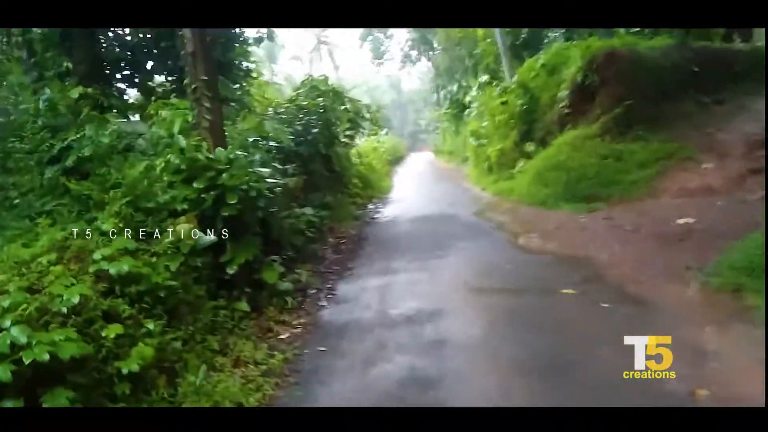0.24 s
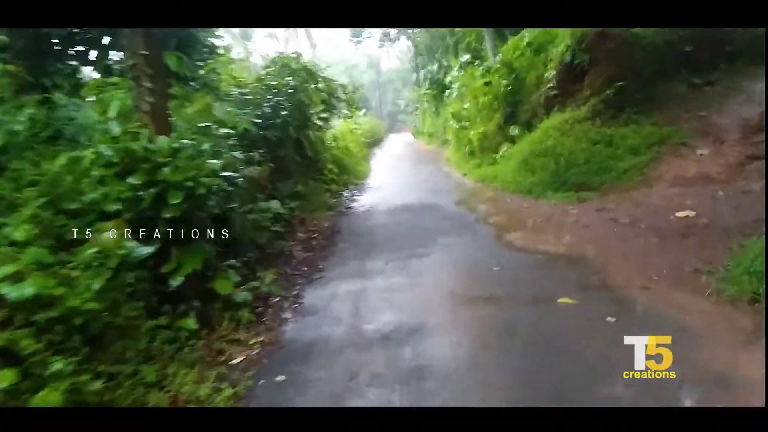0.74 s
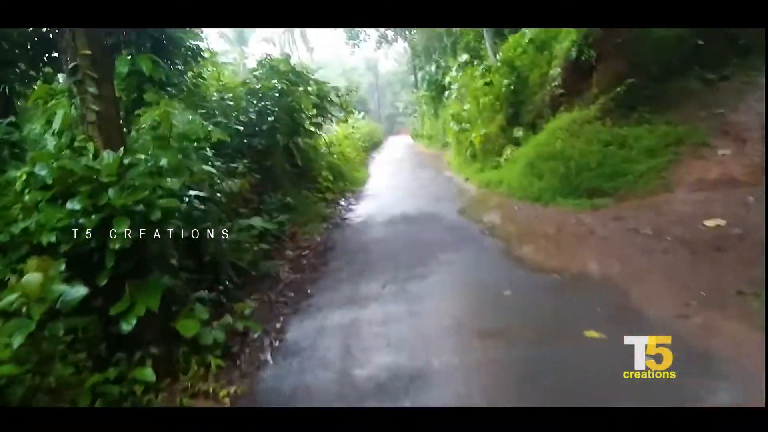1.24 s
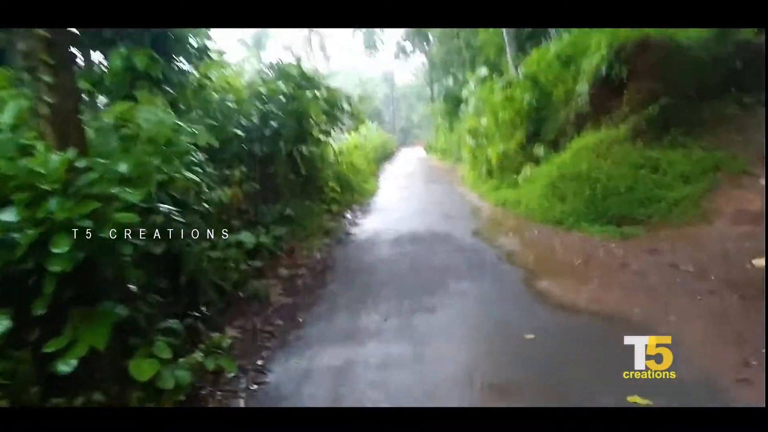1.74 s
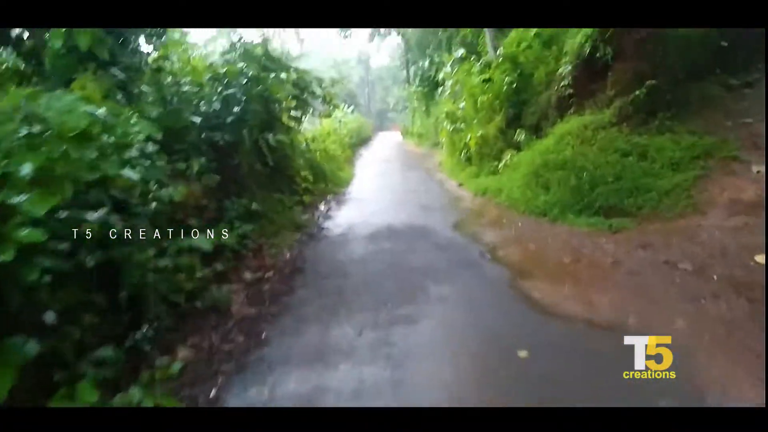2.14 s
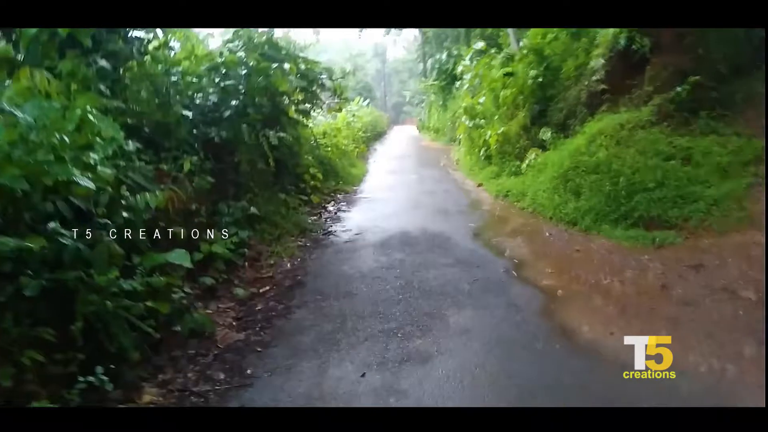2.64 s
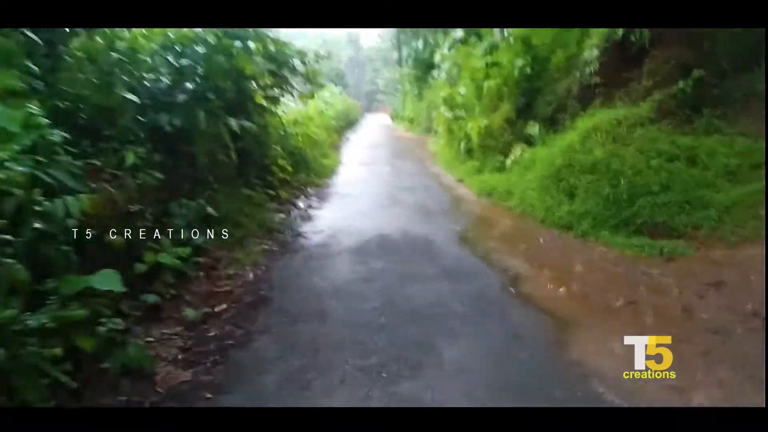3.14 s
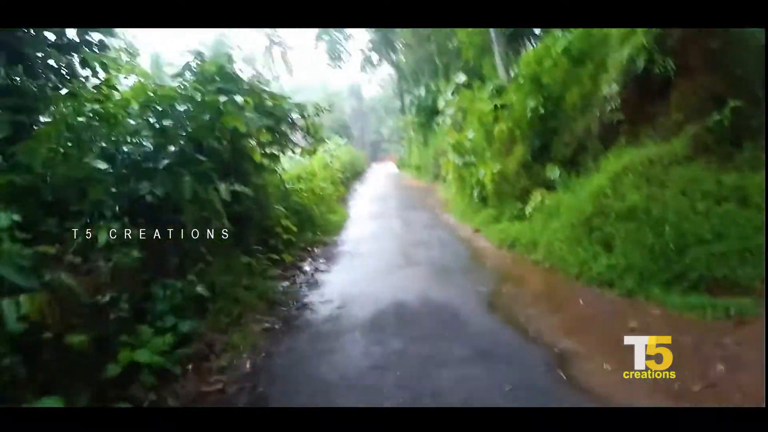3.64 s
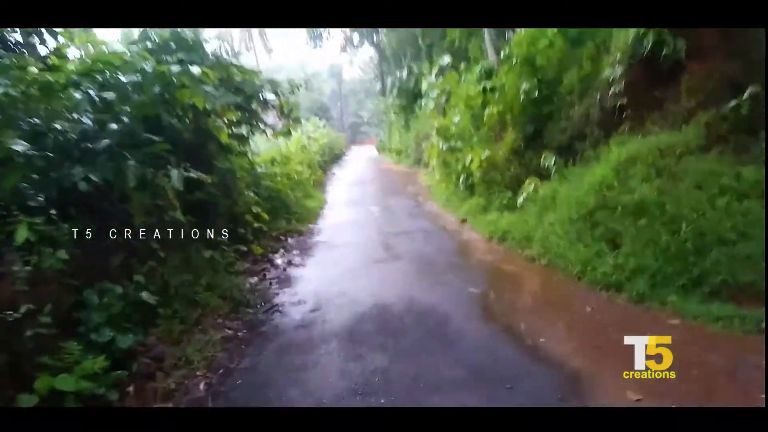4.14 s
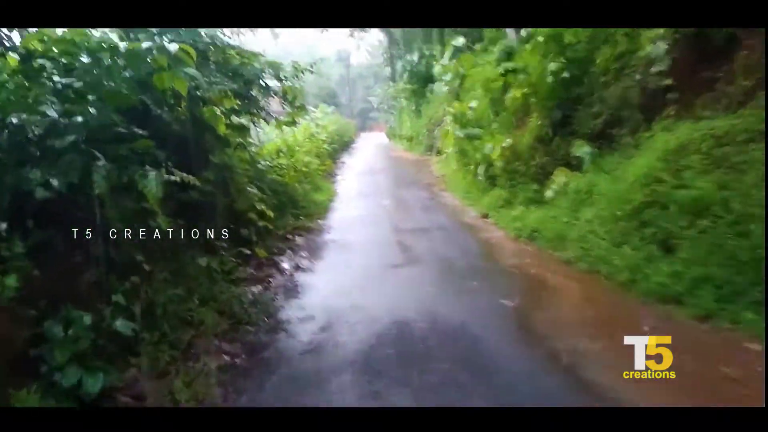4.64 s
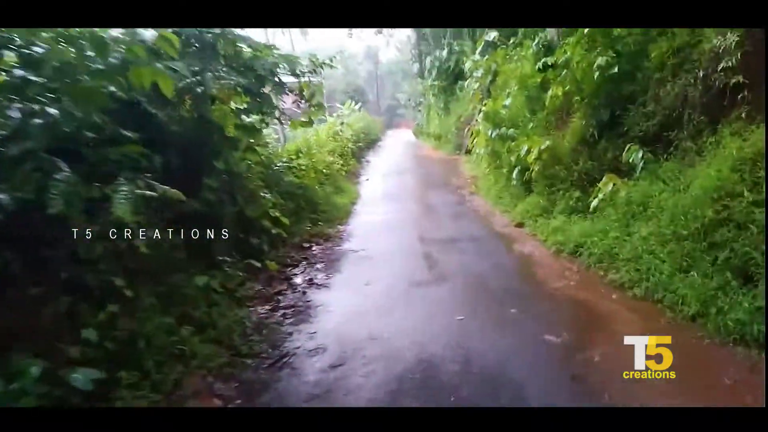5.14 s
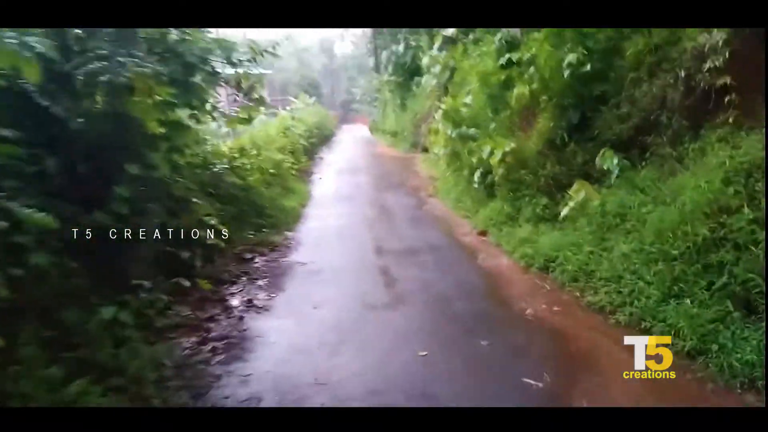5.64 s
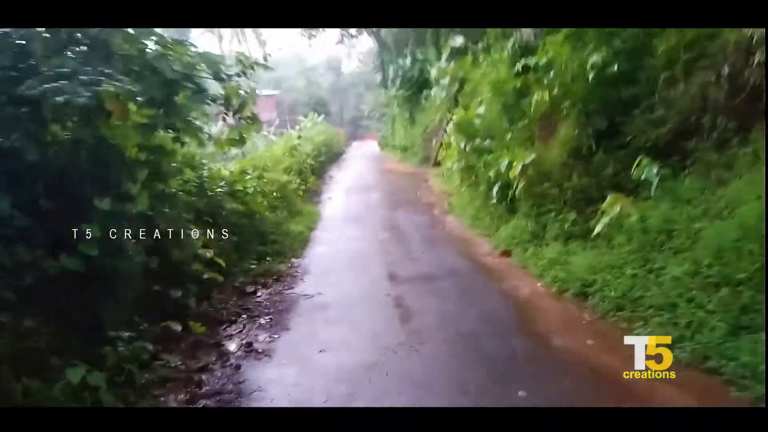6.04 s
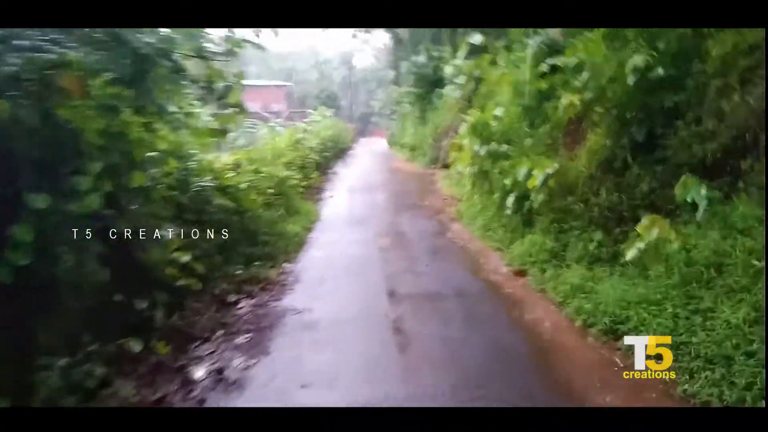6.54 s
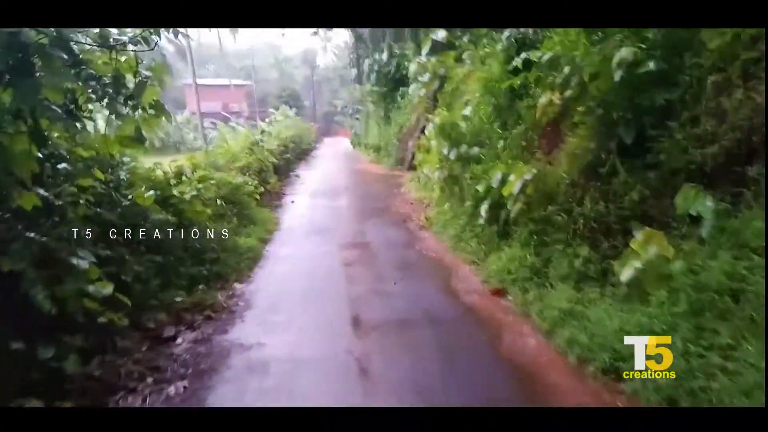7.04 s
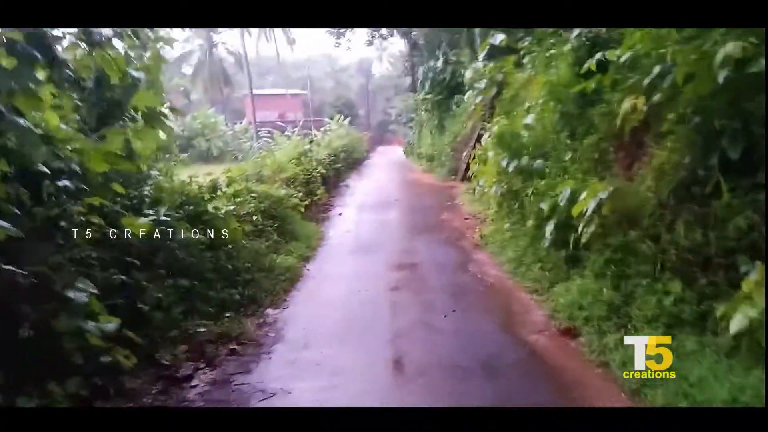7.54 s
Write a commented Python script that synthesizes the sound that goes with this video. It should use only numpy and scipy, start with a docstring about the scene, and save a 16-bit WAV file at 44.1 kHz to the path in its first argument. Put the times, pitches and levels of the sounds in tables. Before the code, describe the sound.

Close under an umbrella on a wet lane between bushes, steady rain makes a continuous hiss and dense patter on leaves. Fine drops drum on the cloth, with crisp little ticks nearby. After the first moment, heavy drips strike overhead at irregular intervals, some dull thumps, some tight pops, some splashy snaps, in loose clusters to the end.

```python
"""A country lane in steady monsoon rain, heard from under an umbrella carried between wet bushes.
Far rain is a smooth hiss of filtered noise; rain on leaves and cloth is random clicks smeared into noise puffs.
Near leaf drops are short pitched ticks; the carried umbrella rumbles softly in low band-passed noise.
Tree drips thump and ring the taut cloth as damped modes and burst into spray, with droplets trailing."""
import sys
import numpy as np
from scipy import signal
from scipy.fft import rfft, irfft
from scipy.io import wavfile
from scipy.ndimage import uniform_filter1d

SR = 44100
rng = np.random.default_rng(int(sys.argv[2]) if len(sys.argv) > 2 else 0)


def wav_record(signal):
    """Record a signal, one row per channel, as 16-bit PCM in the file named by sys.argv[1]."""
    frames = np.transpose(np.atleast_2d(signal))
    bounded = np.clip(frames, -1, 1)
    # unit amplitude maps onto the largest positive 16-bit level
    quanta = np.round(bounded * 32767).astype(np.int16)
    wavfile.write(sys.argv[1], SR, quanta)


N = 343980
TIME_S = np.arange(N) / SR
DROP_TIME_S = np.arange(1024) / SR
SPRAY_DECAY_S = .0011  # amplitude time constant


def undb(db):
    """Decibels to gain."""
    return 10 ** (np.asarray(db) / 20)


def unit(x):
    """Scale to rms 1."""
    return x / np.sqrt(np.mean(x ** 2))


def unit_blow(x):
    """Scale each row so that its energy equals rms 1 held for 2 ms."""
    energy = np.sum(x ** 2, axis=-1, keepdims=True)
    return x / np.sqrt(energy / (.002 * SR))


def butter(x, hz, kind):
    """Butterworth low-pass, high-pass or band-pass, design order 2."""
    return signal.sosfilt(signal.butter(2, hz, kind, fs=SR, output="sos"), x)


def colour(x, points):
    """Minimum-phase filter with the given (frequency [Hz], level [dB]) response: clicks keep a sharp front."""
    hz, db = np.transpose(points)
    bins_hz = np.arange(2049) * SR / 4096
    gain = undb(np.interp(np.log(bins_hz + 1), np.log(hz), db))
    cepstrum = irfft(np.log(gain))
    # fold the cepstrum onto positive time
    fold = 1 + np.sign(len(cepstrum) / 2 - np.arange(len(cepstrum)))
    fold[0] = 1
    impulse_response = irfft(np.exp(rfft(cepstrum * fold)))
    return signal.fftconvolve(x, impulse_response)[:N]


def walk(rate_hz):
    """Random levels held 1 / rate_hz s and slewed twice; spread near 1."""
    hold = int(SR / rate_hz)
    steps = np.repeat(rng.standard_normal(N // hold + 1), hold)
    slewed = uniform_filter1d(uniform_filter1d(steps, hold), hold)
    return 1.3 * slewed[:N]  # restores the spread lost in slewing


def mode(hz, t60_s):
    """A struck mode: starts at full swing and decays 60 dB in t60_s."""
    decay = np.exp(-np.log(1000) * DROP_TIME_S / t60_s)
    return np.cos(2 * np.pi * hz * DROP_TIME_S) * decay


def place(times_s, sounds):
    """Lay each short sound at its time."""
    index = (np.asarray(times_s) * SR).astype(int)[:, None] + np.arange(sounds.shape[1])
    return np.bincount(index.ravel(), sounds.ravel(), N)[:N]


def impacts(rate_hz, spread_db, top_db):
    """Clicks at random moments: many faint, few strong, sizes saturating at top_db."""
    size_db = top_db * np.tanh(spread_db * rng.exponential(size=N) / top_db)
    return (rng.random(N) < rate_hz / SR) * undb(size_db)


def spatter(clicks, decay_s):
    """Each click bursts into its own decaying puff of noise, so no two drops have the same colour."""
    keep = np.exp(-2 / (decay_s * SR))  # power decays twice as fast as amplitude
    power = signal.lfilter([1], [1, -keep], clicks ** 2)
    return unit(np.sqrt(power + 1e-18) * rng.standard_normal(N))


# fine-rain strength as the trees close and open overhead; only its departure from the mean counts:
# (time [s], level [dB])
SHOWER = [(0.0, -28), (0.39, -28.5), (2.37, -33.5), (2.58, -30.5), (3.08, -31), (3.78, -28.5), (4.47, -35),
          (5.02, -34), (5.49, -27.5), (6.04, -31), (6.89, -28), (6.97, -29.5), (7.39, -26), (7.8, -25.5)]


def shower_db():
    """Strength of the fine rain in dB above its average."""
    db = np.interp(TIME_S, *np.transpose(SHOWER))
    return db - db.mean()


# colour of rain on leaves and road, also of trailing droplets: (frequency [Hz], relative level [dB])
FOLIAGE = [(40, -13), (120, -2.5), (450, 1), (2500, 2), (5000, -1), (7000, 1.5), (8600, -4.5), (9800, -7),
           (10700, -11.5), (16000, -17)]


def surroundings(rate_hz=2600, spread_db=3.0, top_db=22, decay_s=0.00056, hiss_db=-2,
                 flicker_db=1, swell_db=0.18, follow=0.055, level_db=-25.5):
    """Dense patter on the bushes, coming in flurries, over the smooth hiss of far rain."""
    flurries = undb(flicker_db * walk(20))
    patter = flurries * spatter(impacts(rate_hz, spread_db, top_db), decay_s)
    hiss = undb(hiss_db) * rng.standard_normal(N)
    gain = undb(level_db + follow * shower_db() + swell_db * walk(3.4))
    return gain * unit(colour(patter + hiss, FOLIAGE))


# colour of fine rain on the cloth: (frequency [Hz], relative level [dB])
CLOTH = [(40, -31), (130, -6), (400, -1.5), (1050, -1), (2200, -2.5), (3500, -12.5), (7000, -12),
         (11000, -46)]


def fine_drops(mean_rate_hz=340, rate_slope=1.9, spread_db=4.5, top_db=18, level_db=-29.0):
    """Small raindrops drum on the cloth: lone taps under the trees, a dense roll where they open."""
    flow = unit(undb(rate_slope * shower_db())) ** 2  # mean 1
    taps = spatter(impacts(mean_rate_hz * flow, spread_db, top_db), SPRAY_DECAY_S)
    return undb(level_db) * unit(colour(taps, CLOTH))


def leaf_ticks(count=600, low_hz=1300, high_hz=8000, t60_s=0.0059, spread_db=3.0, top_db=15,
               follow=1.0, level_db=-31):
    """Single drops on near leaves and the umbrella's rim: each a brief tick of its own pitch."""
    when, pitch, size, partner = rng.random((count, 4)).T[:, :, None]
    hz = low_hz + (high_hz - low_hz) * pitch
    # a lower, faster-dying partner is subtracted, so the tick starts from zero
    tick = unit_blow(mode(hz, t60_s) - mode(hz / (1 + partner / 2), t60_s / 2))
    size_db = top_db * np.tanh(-spread_db * np.log(1 - size) / top_db)
    shower_level_db = follow * shower_db()[(when * N).astype(int)]
    ticks = undb(size_db + shower_level_db + level_db) * tick
    return butter(place(when[:, 0] * N / SR, ticks), high_hz, "low")


def specks(rate_hz=40, spread_db=5, top_db=20, low_hz=7000, level_db=-45):
    """Tiny specks of spray strike right beside the microphone, thin and bright."""
    puffs = spatter(impacts(rate_hz, spread_db, top_db), SPRAY_DECAY_S / 2)
    return undb(level_db) * unit(butter(puffs, low_hz, "high"))


def sway(level_db=-50, swing_db=4):
    """The carried umbrella rumbles softly now and then."""
    rumble = butter(rng.standard_normal(N), [62, 125], "band")
    return undb(level_db) * unit(undb(swing_db * walk(7)) * rumble)


# modes of the whole canopy, before each hit shifts them: (frequency [Hz], t60 [s], relative level [dB])
CANOPY = [(296, 0.0076, 12), (527, 0.0088, 1.5), (974, 0.024, -1)]
# colour of a splash: (frequency [Hz], relative level [dB])
SPLASH = [(1000, -7.5), (3200, -2), (7300, 1), (10500, -19), (16000, -44)]


def strike(times_s, level_db, tightness, spray_share,
           panel_hz=1750, tension_oct=0.41, detune=0.24, panel_t60_s=0.0072, sustain=.6, build_s=0.00006,
           overtone_ratio=1.75, overtone_db=-4, click=1.2, contact_hz=4500, push_s=.00007,
           thump_db=2, ring_db=-2.0, splash_db=5.5, road_s=0.00694, road_db=-13):
    """Each drop pushes the whole canopy, rings the panel it lands on and bursts into spray."""
    # energy split: what does not burst thumps slack cloth or rings tight cloth near a rib
    tight, burst_share = np.clip([tightness, spray_share], .01, .99)[:, :, None]
    cloth_share = 1 - burst_share
    shares = [cloth_share * (1 - tight), cloth_share * tight, burst_share]
    thump, ring, splash = undb(level_db)[:, None] * np.sqrt(shares)

    # place of the hit shifts the three modes (0-2), their damping (3) and the overtone (4)
    shift = np.exp(rng.uniform(-.25, .25, (len(times_s), 5))).T[:, :, None]
    canopy = sum(undb(db) * mode(hz * s, t60_s * shift[3]) for (hz, t60_s, db), s in zip(CANOPY, shift))
    canopy = canopy * (1 - np.exp(-DROP_TIME_S / push_s))

    # tighter cloth rings higher and longer
    tension = 2 ** (tension_oct * (2 * tight - 1))
    ring_hz = panel_hz * tension * np.exp(detune * rng.uniform(-1.02, 1, tight.shape))
    ring_t60_s = panel_t60_s * (1 + sustain * tight ** 2)
    overtone = mode(ring_hz * overtone_ratio * shift[4], ring_t60_s / 2)
    panel = mode(ring_hz, ring_t60_s) - undb(overtone_db) * overtone
    # the ring builds up while the drop flattens
    panel = panel * (1 - np.exp(-DROP_TIME_S / build_s))

    thumps = thump * undb(thump_db) * unit_blow(canopy)
    rings = ring * undb(ring_db) * unit_blow(panel)
    cloth = place(times_s, thumps + rings)

    noise = rng.standard_normal((len(times_s), len(DROP_TIME_S)))
    spray = noise * np.exp(-DROP_TIME_S / SPRAY_DECAY_S) + click * (DROP_TIME_S == 0)
    burst = colour(place(times_s, splash * undb(splash_db) * unit_blow(spray)), SPLASH)

    # the thump comes back from the road
    echo = np.interp(TIME_S - road_s, TIME_S, butter(cloth, 900, "low"), left=0)
    return butter(cloth, contact_hz, "low") + burst + undb(road_db) * echo


# heavy drips on the umbrella: (time [s], cloth tightness where it lands [0-1], share bursting into spray [0-1])
DRIPS = [(0.7432, 0.56, 0.2), (0.7866, 0.27, 0.1), (1.0173, 0.33, 0), (1.1198, 0.2, 0), (1.179, 0.07, 0.46),
         (1.2624, 0.78, 0.33), (1.3723, 0.27, 0.04), (1.4899, 0.34, 0.57), (1.6596, 0.46, 0.2),
         (1.6795, 0.5, 0.88), (1.7678, 0.38, 0.24), (1.7861, 0.5, 0.54), (1.8552, 0.4, 0.41),
         (1.8658, 0.45, 0.35), (1.8714, 0.5, 0), (1.9344, 0.66, 0.04), (2.0252, 0, 0), (2.1096, 0.15, 0.2),
         (2.341, 0.7, 0.5), (2.4226, 0.22, 0.17), (2.518, 0.1, 0.07), (2.5579, 0.63, 0.2),
         (2.5734, 0.56, 0.13), (2.5833, 0.3, 0.35), (2.6133, 0.1, 0.18), (2.7262, 0.6, 0.57),
         (2.843, 0.27, 0), (3.0654, 0.35, 0.23), (3.277, 0.73, 0.7), (3.347, 0, 0.1), (3.3962, 0, 0.6),
         (3.4534, 0, 0.55), (3.483, 0.3, 0.25), (3.5708, 0.45, 0.27), (3.7884, 0.2, 0.4),
         (3.8647, 0.14, 0.4), (3.923, 0.4, 0.14), (3.9577, 0.36, 0.04), (4.0087, 0.89, 0),
         (4.0762, 0.7, 0.17), (4.2276, 0.64, 0.64), (4.4268, 1, 0.99), (4.457, 0.91, 0.16),
         (4.524, 0.44, 0.26), (4.5656, 0.35, 0.04), (4.6684, 0.43, 0.6), (4.7229, 0.36, 0),
         (4.8672, 1, 0.14), (5.1909, 0.04, 0.2), (5.2465, 0.73, 0.4), (5.3149, 0.13, 0.5),
         (5.3341, 0.43, 0.5), (5.3782, 0.26, 0.6), (5.5054, 0.04, 0.44), (5.5935, 0.84, 0),
         (5.6023, 0.16, 0.16), (5.7139, 0.83, 0.12), (5.757, 0.3, 0.2), (5.9218, 0.73, 0.1),
         (6.0238, 0.5, 0.47), (6.0369, 0.1, 0.34), (6.269, 0.6, 0), (6.3056, 0.3, 0.34), (6.3259, 0.6, 0.1),
         (6.4829, 0.3, 0.2), (6.5577, 0.35, 0.12), (6.6982, 0, 0.35), (6.7193, 0, 0.23),
         (6.7412, 0.64, 0.1), (6.758, 0, 0.2), (6.7777, 0.2, 0), (6.7942, 0.94, 0.2), (6.8004, 0.5, 0.4),
         (6.8815, 0.43, 0.1), (6.94, 0.4, 0.14), (7.01, 0.6, 0.17), (7.0367, 0.45, 0.26),
         (7.0764, 0.28, 0.15), (7.2016, 0.74, 0.4), (7.2665, 0.15, 0.04), (7.3556, 0.5, 0.47),
         (7.5979, 0.6, 0.8), (7.7802, 0.45, 0.45)]


def heavy_drops(level_db=-8.5):
    """Heavy drips, all played at one level; they differ in cloth tightness and spray share."""
    times_s, tightness, spray_share = np.transpose(DRIPS)
    return strike(times_s, np.full(len(times_s), level_db), tightness, spray_share)


def light_drops(count=44, bunch_s=.07, top_level_db=-14.5, range_db=6, max_tightness=0.56, max_spray=0.23):
    """A shaken branch sheds lighter drips too, shortly before and after the heavy ones."""
    which, lag, size, tightness, spray_share = rng.random((count, 5)).T
    drip_index = ((np.arange(count) + which) / count * len(DRIPS)).astype(int)
    beside_s = np.array(DRIPS)[drip_index, 0]
    times_s = np.abs(beside_s + bunch_s * (2 * lag - 1))
    level_db = top_level_db - range_db * size
    return strike(times_s, level_db, max_tightness * tightness, max_spray * spray_share)


def droplets(count_per_drip=3, scatter_s=.009, spread_db=6, spray_db=9, level_db=-37):
    """A heavy drip breaks up as it falls: a few droplets trail just behind it."""
    lag, size = rng.standard_normal((len(DRIPS) * count_per_drip, 2)).T
    times_s, _, spray_share = np.repeat(DRIPS, count_per_drip, axis=0).T
    size_db = spray_db * spray_share + spread_db * np.tanh(size)
    clicks = place(times_s + scatter_s * np.abs(lag), undb(size_db)[:, None])
    return undb(level_db) * unit(colour(spatter(clicks, SPRAY_DECAY_S), FOLIAGE))


def scene():
    """Umbrella close overhead, foliage all around; one channel."""
    around = surroundings() + fine_drops() + leaf_ticks() + specks() + sway()
    drips = heavy_drops() + light_drops() + droplets()
    return (around + drips)[None]


def limiter(x, threshold=.85, release_s=.1, strength=.5):
    """Each peak over the threshold turns the gain down; the cut decays with time constant release_s."""
    fall = TIME_S / release_s
    over = np.log(np.maximum(np.abs(x[0]) / threshold, 1) + 1e-9)
    held = np.exp(np.maximum.accumulate(np.log(over) + fall) - fall)
    return x * np.exp(-strength * held)


def record(dry, notch_hz=770, notch_q=2.3, notch_depth=0.54, bass_hz=70, top_hz=15900):
    """Microphone: hollow mids, little bass; recorder: limits and rounds peaks, cuts the top."""
    mids = signal.lfilter(*signal.iirpeak(notch_hz, notch_q, fs=SR), dry)
    hollow = dry - notch_depth * mids
    limited = limiter(butter(hollow, bass_hz, "high"))
    rounded = 2 * np.tanh(limited / 2)
    return signal.sosfilt(signal.ellip(10, .2, 80, top_hz, fs=SR, output="sos"), rounded)


dry = scene()
out = record(dry)
wav_record(out)
```